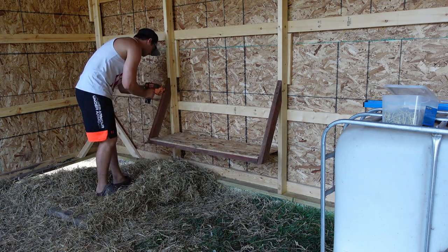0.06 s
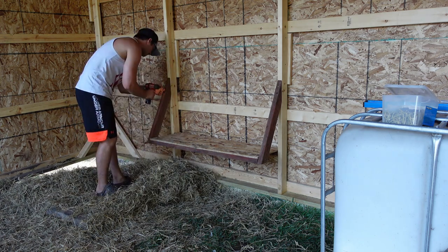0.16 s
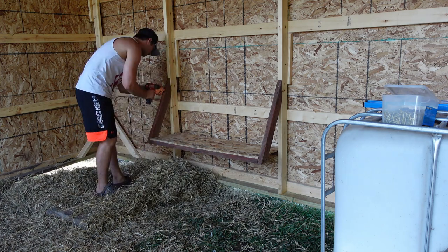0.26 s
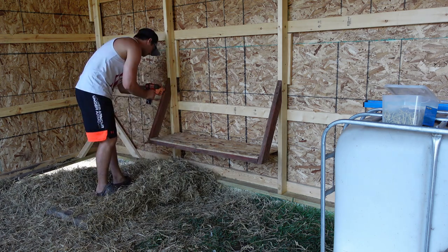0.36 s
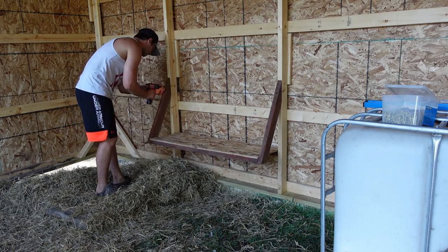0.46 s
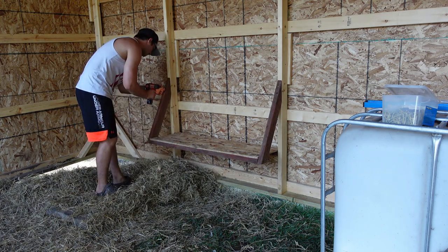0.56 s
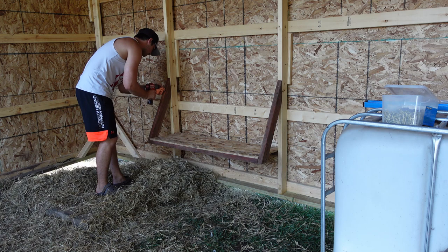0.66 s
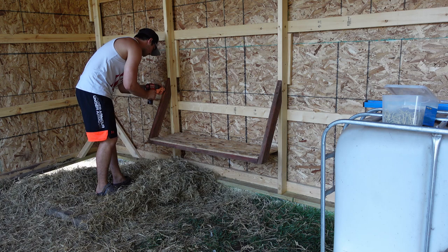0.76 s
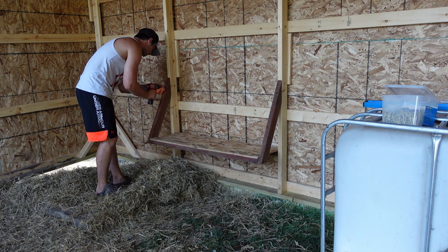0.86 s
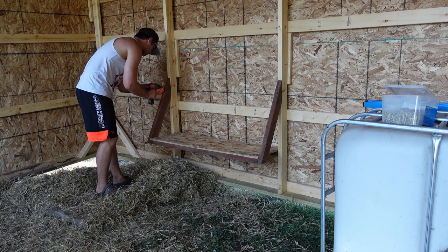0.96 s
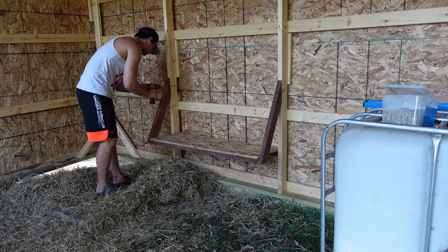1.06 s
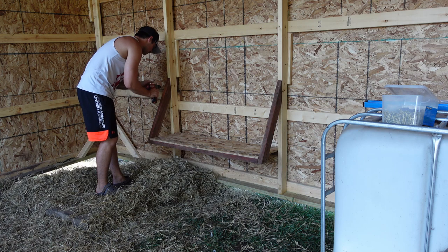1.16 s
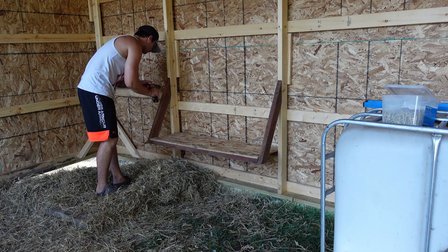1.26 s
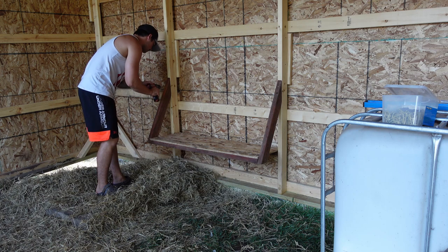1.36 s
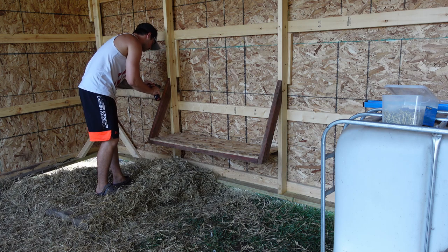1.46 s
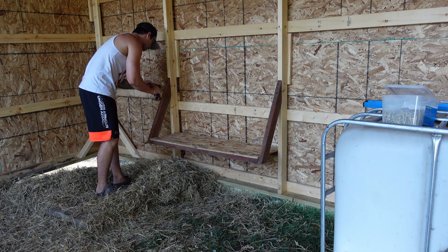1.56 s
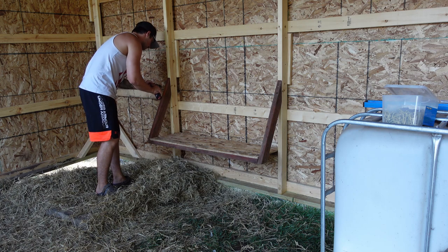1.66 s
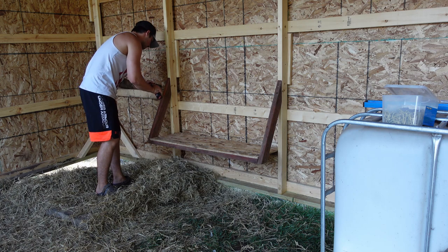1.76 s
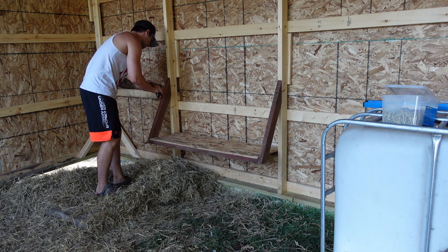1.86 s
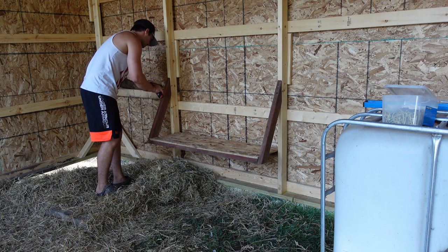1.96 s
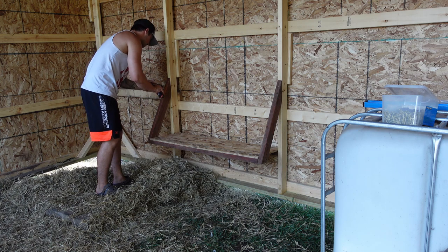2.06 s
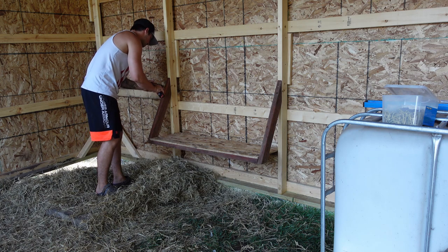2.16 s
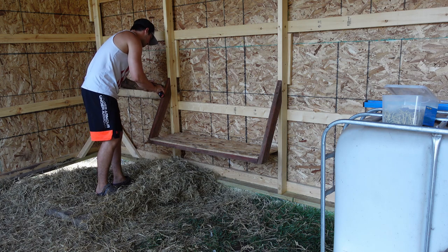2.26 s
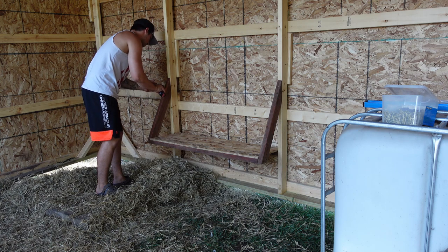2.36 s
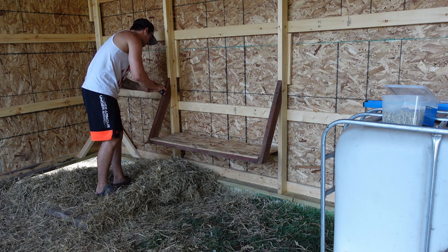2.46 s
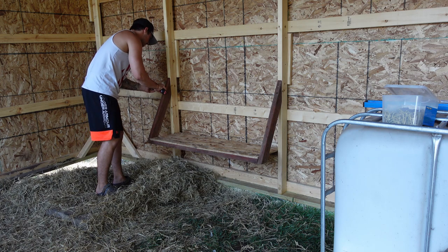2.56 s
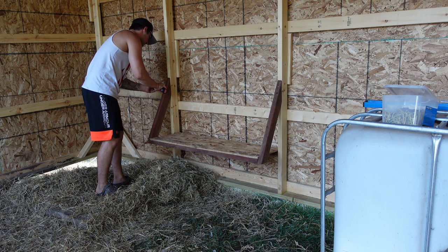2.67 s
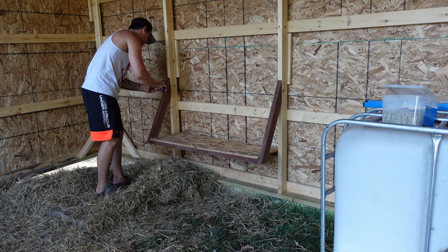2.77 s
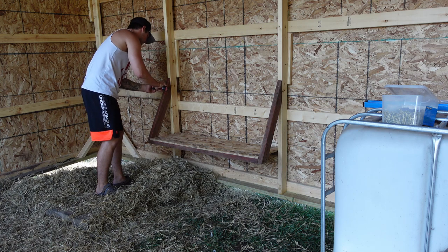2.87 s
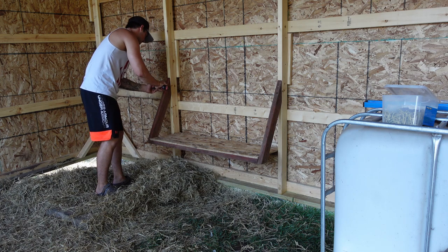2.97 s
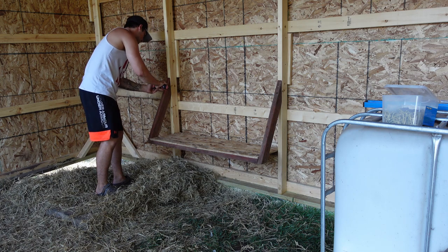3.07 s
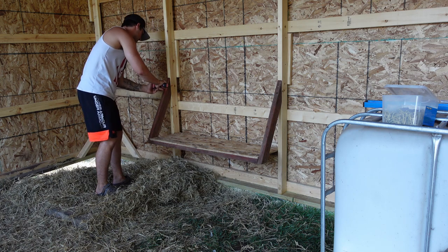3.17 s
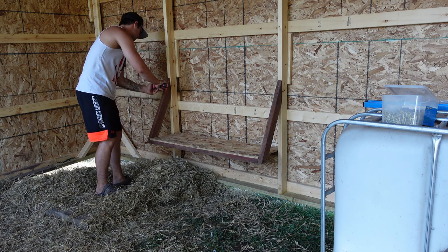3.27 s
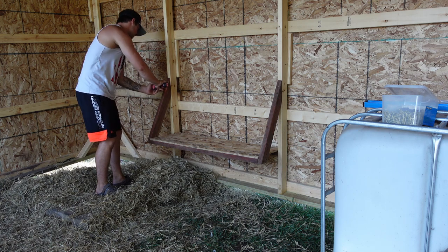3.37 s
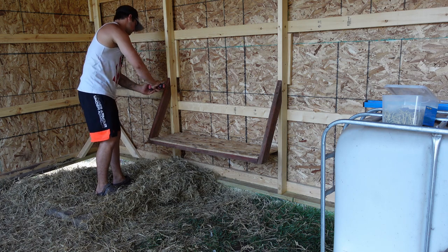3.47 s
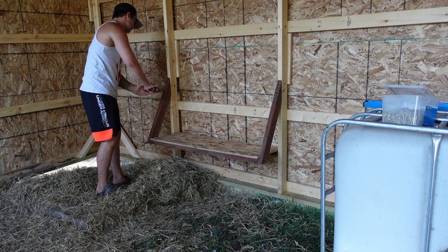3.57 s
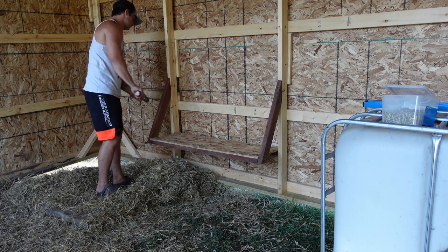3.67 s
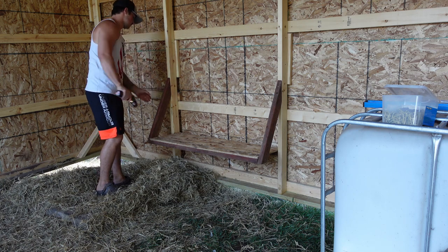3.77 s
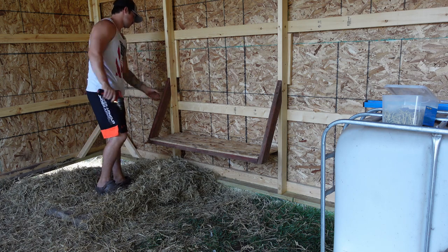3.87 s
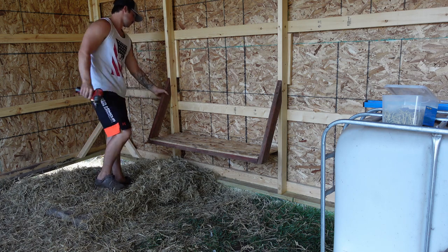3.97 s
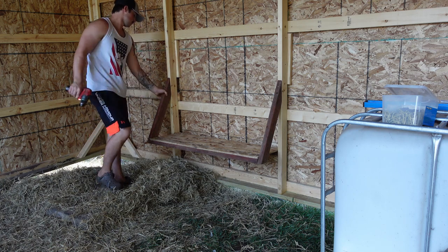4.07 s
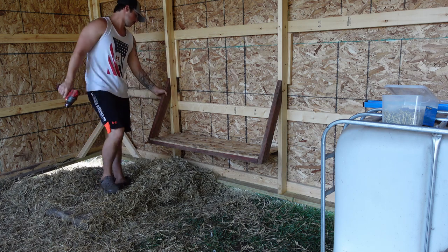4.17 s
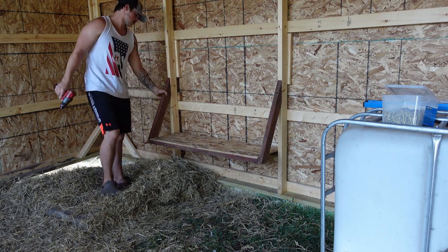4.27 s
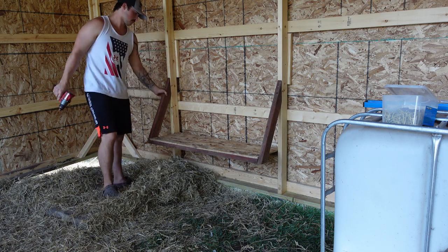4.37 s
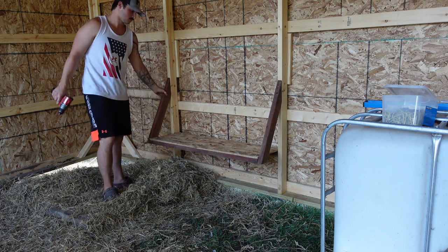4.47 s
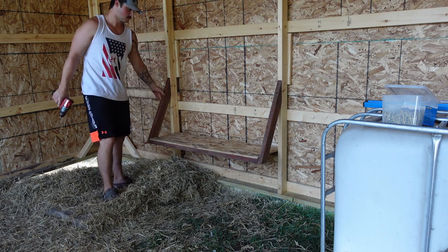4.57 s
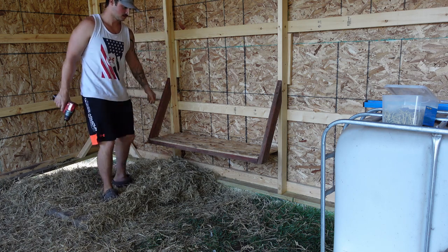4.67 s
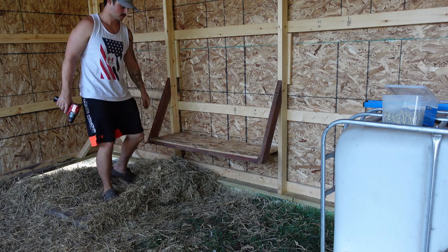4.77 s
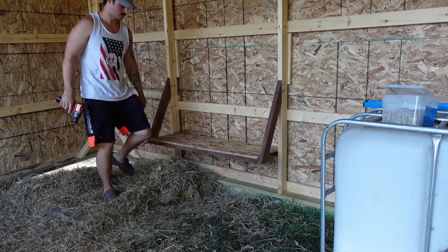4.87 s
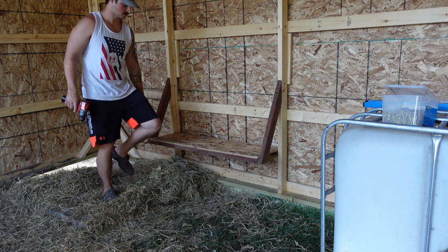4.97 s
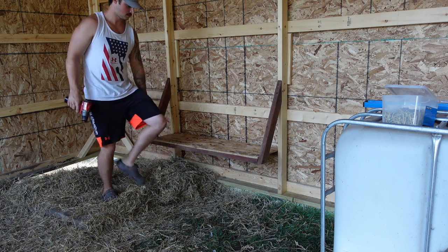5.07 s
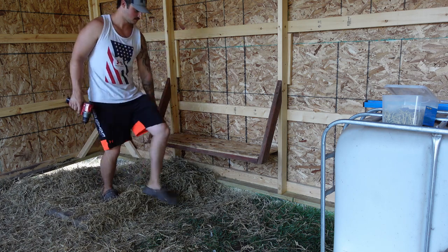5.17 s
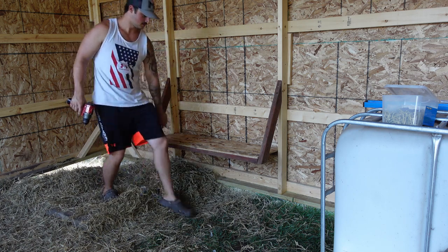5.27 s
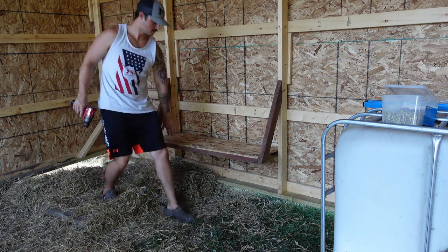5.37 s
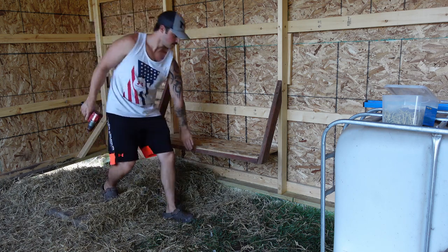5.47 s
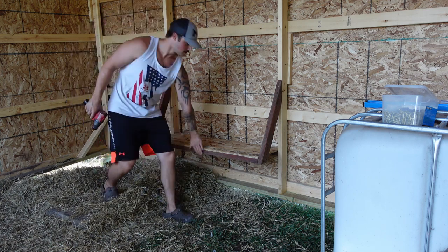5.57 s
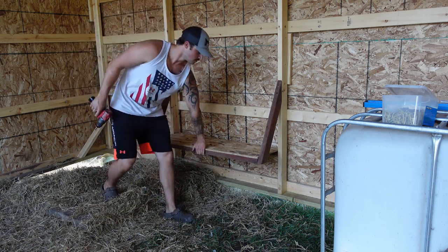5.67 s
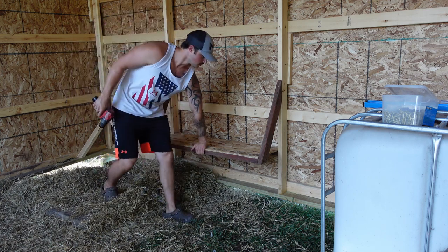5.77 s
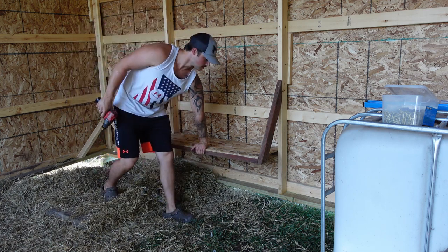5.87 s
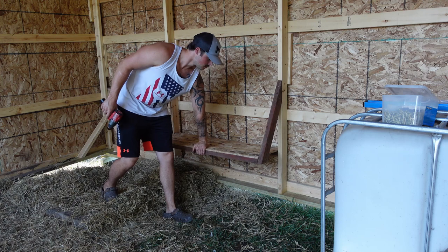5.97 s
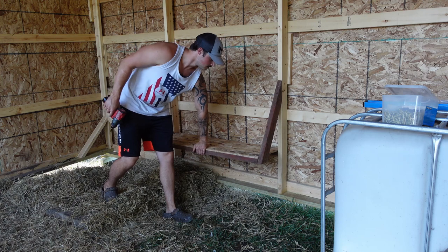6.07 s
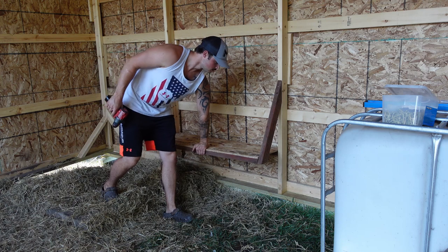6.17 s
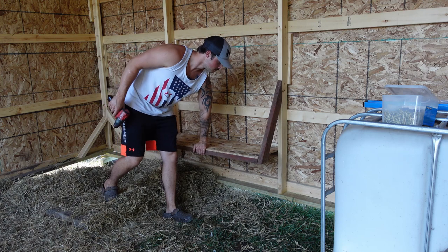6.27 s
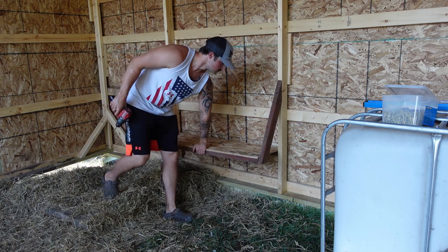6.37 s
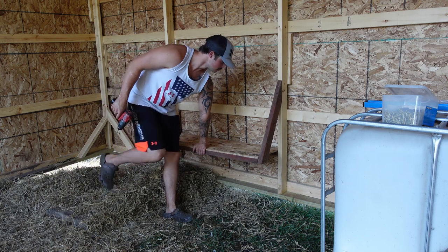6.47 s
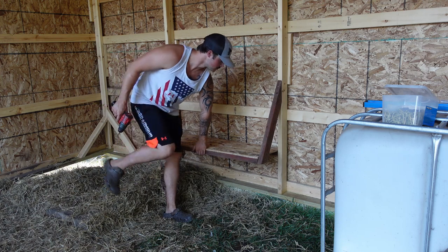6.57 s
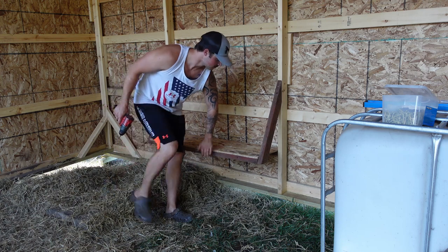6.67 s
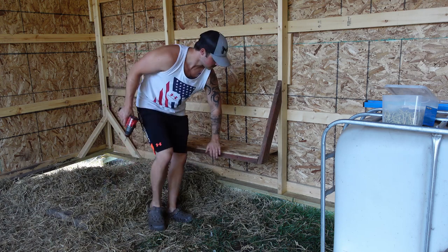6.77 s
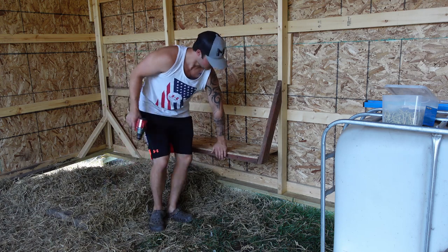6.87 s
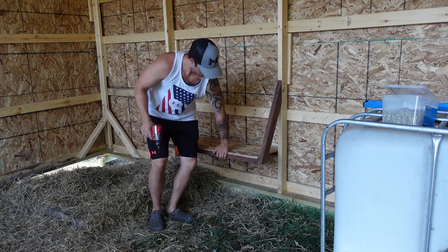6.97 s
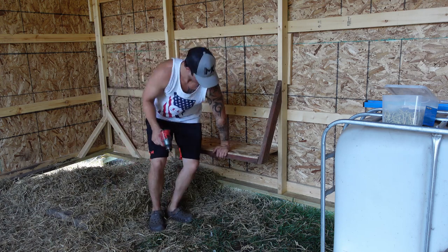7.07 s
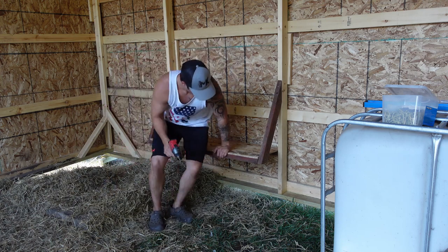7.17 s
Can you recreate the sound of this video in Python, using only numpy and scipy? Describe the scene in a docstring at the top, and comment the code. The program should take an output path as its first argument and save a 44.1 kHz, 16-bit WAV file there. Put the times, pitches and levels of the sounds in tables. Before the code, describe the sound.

In a small wooden shed, two drill bursts drum through timber, the second straining lower, before knocks, rustling straw steps and a short shelf creak.

```python
"""A cordless drill runs twice in a board-lined shed: first creeping up in steps, then at full speed, bogging down
as the screw bites. The motor whine is made of sines at multiples of the rotor speed, the gear hiss is coloured
noise, and the timber drums as noise through resonances. Knocks and footfalls are short resonant rattles. Feet
shuffle in straw (noise and clicks), the shelf creaks once (stick-slip pulses and two gliding sines), wind rumbles
on the microphone (low noise) and a faint bed of air noise lies under it all."""
import sys
import numpy as np
from scipy import signal
from scipy.fft import rfft, irfft, next_fast_len
from scipy.io import wavfile
from scipy.ndimage import uniform_filter1d

SR = 44100
rng = np.random.default_rng(int(sys.argv[2]) if len(sys.argv) > 2 else 0)


def dump(signal):
    """Clip the signal to [-1, 1] and save it as 16-bit WAV at the path in sys.argv[1]."""
    limited = np.clip(np.atleast_2d(signal).T, -1, 1)
    pcm = np.round(limited * 32767).astype(np.int16)
    wavfile.write(sys.argv[1], SR, pcm)


N = 318222
CUTOFF_HZ = 15800   # no motor sine lies above this, and the final low-pass closes just over it


def from_db(db):
    """dB to gain."""
    return 10 ** (np.asarray(db) / 20)


def rms_one(x):
    """Scale to rms 1."""
    return x / np.sqrt(np.mean(x ** 2) + 1e-20)


def in_time(rows, start=0, stop=N):
    """Columns of a table of curves over time, one value a sample; the ends are held."""
    seconds, *columns = np.transpose(rows)
    sample_s = np.arange(start, stop) / SR
    return [np.interp(sample_s, seconds, column) for column in columns]


def at_hz(points, hz):
    """Read a curve of dB against frequency, on a log-frequency axis."""
    points = np.array(points)
    return np.interp(np.log(hz), np.log(points[:, 0]), points[:, 1])


def drift(rate_hz, size=N):
    """Slow random wander of spread 1: noise smoothed at one value per 40 samples, then joined by lines."""
    r = np.exp(-80 * np.pi * rate_hz / SR)
    noise = rng.standard_normal(size // 40 + 2002)
    slow = signal.lfilter([1], [1, -2 * r, r * r], noise)[2000:]   # drop the filter's start
    return np.interp(np.arange(size) / 40, np.arange(len(slow)), rms_one(slow))


def coloured(x, spectrum):
    """Give a signal the spectrum, closed below its low end; rms 1."""
    hz = np.arange(len(x) // 2 + 1) * SR / len(x) + 1
    gain = from_db(at_hz(spectrum, hz)) * (hz > spectrum[0][0])
    return rms_one(irfft(rfft(x) * gain, len(x)))


def resonate(x, hz, width_hz):
    """One resonance, gain 1 on top."""
    r = np.exp(-np.pi * width_hz / SR)
    feedback = [1, -2 * r * np.cos(2 * np.pi * hz / SR), r * r]
    return signal.lfilter([(1 - r * r) / 2, 0, (r * r - 1) / 2], feedback, x)


def body(x, modes, flicker_db):
    """Parallel resonances whose tops stand at the given dB, each driven unevenly; rms 1."""
    total = 0
    for k, (hz, width_hz, db) in enumerate(modes):
        drive = x * from_db(flicker_db * drift(6.4, len(x)))
        total = total + (-1) ** k * from_db(db) * resonate(drive, hz, width_hz)
    return rms_one(total)


def grains(per_s, spread_db, size=N):
    """Random clicks of uneven strength."""
    strength = from_db(spread_db * np.minimum(rng.exponential(1, size), 4))
    sizes = strength * rng.choice([-1, 1], size)
    return sizes * (rng.random(size) < per_s / SR) + 1e-18


def burst(hz, width_hz, t60_s, attack_s):
    """A dying rattle of soft contacts in a steep resonance; peak 1."""
    age = np.arange(SR // 3) / SR
    fade = from_db(-60 * age / max(t60_s, .02))
    rattle = rng.standard_normal(len(age)) * fade * np.minimum(age / attack_s, 1)
    thud = resonate(resonate(rattle, hz, width_hz), hz, width_hz)
    return thud / np.abs(thud).max()


def air():
    """Faint steady noise, strongest in the lows."""
    # colour of the noise: (pitch_hz, relative level_db per Hz)
    air_colour = [(53, -22), (90, -14), (136, -3), (671, -8.5), (1740, -13.5), (2980, -17.5), (6490, -21.5),
                  (8230, -18), (13800, -31), (15700, -20)]
    return from_db(-47) * coloured(rng.standard_normal(N), air_colour)


def wind():
    """Lumpy low noise of air across the microphone port."""
    # gusts: (time_s, deep rumble level_db, upper rumble level_db)
    gust_levels = [(0.0, -49.5, -47.5), (0.38, -29, -48), (0.54, -42, -47), (1.45, -43, -49),
                   (1.67, -28.5, -49), (2.4, -36.5, -37.5), (3.03, -31.5, -54), (3.52, -39, -29.5),
                   (3.9, -45, -58.5), (4.1, -42, -37.5), (4.4, -40.5, -57), (5.2, -57.5, -57.5),
                   (5.79, -42, -38), (6.5, -33.5, -52), (6.75, -38, -56), (7.22, -45, -54)]
    # the deep and the upper rumble: [low edge_hz, high edge_hz]
    rumble_bands = [20, 36], [48, 77]
    out = 0
    for level_db, band_hz in zip(in_time(gust_levels), rumble_bands):
        band = signal.butter(2, band_hz, "band", fs=SR, output="sos")
        gusts = signal.sosfilt(band, rng.standard_normal(N))
        out = out + from_db(level_db) * rms_one(gusts)
    return out


def shed(x):
    """Sound circles between the board walls on twelve unrelated paths, duller on every round."""
    T60_S, WALLS_DB, DULL_HZ = 0.31, -12.5, 5300   # decay in the lows, level, where highs start to die sooner
    size = next_fast_len(N + SR)
    hz = np.arange(size // 2 + 1) * SR / size
    t60_s = T60_S / np.sqrt(1 + (hz / DULL_HZ) ** 2)
    walls = 0
    for k, lag_s in enumerate(np.geomspace(.011, .037, 12)):
        round_trip = from_db(-60 * lag_s / t60_s) * np.exp(-2j * np.pi * hz * lag_s)
        walls = walls + (-1) ** k * round_trip / (1 - round_trip)   # all rounds of this path
    reverb = from_db(WALLS_DB) * rms_one(np.abs(walls)) * np.exp(1j * np.angle(walls))
    return irfft(rfft(x, size) * (1 + reverb), size)[:N]


def straw():
    """Dense stalk crackle under the feet, and a duller scuff of the soles; each shuffle swells and fades."""
    # feet move: (peak_s, swell_s, fade_s, rustle_db, sole scuff_db)
    shuffles = [(3.95, 0.022, .08, -58, -50), (4.055, 0.064, 0.037, -43.5, -54),
                (4.48, 0.25, 0.26, -39, -50.5), (4.63, 0.17, 0.098, -50, -49),
                (4.82, 0.18, 0.2, -42.5, -42.5), (5.23, 0.048, 0.14, -68, -45), (5.4, 0.24, 0.2, -46, -57),
                (5.48, 0.092, 0.16, -51, -44), (5.7, 0.08, 0.26, -55, -54), (6.27, 0.014, 0.094, -70, -45),
                (6.42, 0.063, 0.11, -37, -38.5), (6.96, 0.087, 0.26, -51, -39)]
    # straw never quite rests: (time_s, level_db)
    settling = [(3.5, -77), (4.4, -64), (5.8, -49.5), (7.2, -48)]
    # colour of the crackle: (pitch_hz, relative level_db per Hz)
    straw_colour = [(880, -60), (1560, -16), (2400, -6), (3970, -9.5), (9910, -8), (13300, -16.5),
                    (15700, -6.5)]
    EDGE_DB = 18.5   # fall of a shuffle at the ends of its swell and fade
    t = np.arange(N) / SR
    rustle, scuffing = from_db(in_time(settling)[0]), 0
    for peak_s, swell_s, fade_s, rustle_db, scuff_db in shuffles:
        before = (peak_s - t) / max(swell_s, .005)
        after = (t - peak_s) / max(fade_s, .005)
        shape = from_db(-EDGE_DB * np.where(t < peak_s, before, after))
        rustle = rustle + from_db(rustle_db) * shape
        scuffing = scuffing + from_db(scuff_db) * shape
    stalks = rng.standard_normal(N) + 0.75 * rms_one(grains(1500, 2.2))
    crackle = coloured(stalks, straw_colour)
    soles = rng.standard_normal(N) + rms_one(grains(500, 1.7))
    scuff = rms_one(resonate(soles, hz=1180, width_hz=440))
    return rustle * crackle + scuffing * scuff


def creak():
    """Fast stick-slip at a joint squeaks, and rough rubbing rings the shelf."""
    # the rub: (time_s, level_db before a 5 dB cut, slips per s)
    rubbing = [(6.865, -55, 510), (6.885, -27, 555), (6.945, -27.5, 623), (6.99, -25, 575),
               (7.06, -28, 578), (7.17, -53, 530)]
    # resonances of the shelf: (pitch_hz, width_hz, level_db)
    shelf = [(558, 34, -10), (625, 61, -7.5), (1013, 16, -4.5), (1150, 23, -6), (1578, 57, -2),
             (1890, 17, -8), (2770, 150, -19), (3900, 290, -27)]
    # the joint squeals on two gliding partials: (time_s, lower pitch_hz, lower level_db, upper level_db)
    squeal_glide = [(6.875, 2860, -70, -75), (6.89, 2860, -41, -56), (6.93, 2870, -40, -60),
                    (6.955, 2713, -37.5, -51), (7.05, 2694, -44, -49), (7.13, 2707, -65, -70)]
    UPPER_RATIO = 1.77   # upper pitch over lower pitch
    level_db, per_s = in_time(rubbing)
    slip_count = np.floor(np.cumsum(per_s * (1 + .012 * drift(60))) / SR)
    slips = np.diff(slip_count, prepend=0)   # a pulse at each slip
    rub = slips * from_db(1.2 * rng.standard_normal(N))
    rub += 0.075 * rng.standard_normal(N) * from_db(2.7 * drift(40))
    sample = np.arange(N)
    loaded = (sample > rubbing[0][0] * SR) & (sample < rubbing[-1][0] * SR)
    hz, low_db, high_db = in_time(squeal_glide)
    phase = 2 * np.pi * np.cumsum(hz * (1 + .006 * drift(52))) / SR
    squeal = from_db(low_db + 3.2 * drift(40)) * np.sin(phase)
    squeal += from_db(high_db + 2.7 * drift(40)) * np.sin(UPPER_RATIO * phase)
    return loaded * (from_db(level_db - 5.0) * body(rub, shelf, flicker_db=3.5) + squeal)


def knocks():
    """Each knock rattles around its own centre, makes the boards thump and crunches some straw."""
    # knocks on timber and footfalls: (start_s, peak_db before a 0.5 dB lift, centre_hz, t60_s,
    # low thump_db, straw crunch_db before a 7.5 dB cut)
    hits = [(1.048, -24, 450.6, 0.071, -22, -13.5), (1.143, -24, 470, 0.34, -45, -41),
            (3.34, -14.5, 314.6, 0.097, -21, -53.5), (3.412, -48, 339, 0.13, -25.5, -59),
            (3.493, -29, 600, 0.18, -25, -57), (3.519, -30.5, 480, 0.068, -39, -47),
            (3.929, -26.5, 453, 0.21, -56, -52), (4.03, -32, 315, 0.26, -33, -42),
            (4.578, -24, 380, 0.11, -33.5, -37), (4.8, -29, 1200, 0.048, -43, -42),
            (5.18, -38, 1260, 0.29, -57, -51), (5.43, -35, 400, 0.057, -46, -28),
            (5.47, -28, 915, 0.046, -52, -40), (5.662, -36, 301, 0.17, -29, -29),
            (5.769, -41, 301, 0.19, -40, -30), (6.07, -36.5, 295, 0.11, -37, -26),
            (6.249, -25, 430, 0.33, -55, -54), (6.409, -30.5, 1300, 0.098, -54, -44),
            (6.863, -35, 1610, 0.22, -51, -41)]
    RISE_CYCLES = 2.9   # a knock builds up over this many cycles of its centre pitch
    out = np.zeros(N)
    for start_s, peak_db, hz, t60_s, thump_db, crunch_db in hits:
        knock = from_db(peak_db + 0.5) * burst(hz, 350 + 0.27 * hz, t60_s, RISE_CYCLES / hz)
        knock += from_db(thump_db) * burst(151, 101, t60_s=0.35, attack_s=0.0074)
        knock += from_db(crunch_db - 7.5) * burst(1800, 5100, t60_s=0.096, attack_s=0.0071)
        out[int(start_s * SR):][:len(knock)] += knock
    return out


def timber(size, tight):
    """The thread tears fibres unevenly; this noise shakes frame and wall, which ring more as they draw tight."""
    # frame and wall resonances: (pitch_hz, width_hz, level_db)
    loose_frame = [(130.5, 40, 0.5), (139.4, 16.7, 6.5), (219, 46, 5.5), (415, 56, -1), (503, 30, 5),
                   (740, 89, -2), (1140, 110, -3)]
    # these ring out as the screw draws the frame tight to the wall: (pitch_hz, width_hz, level_db)
    tight_frame = [(143, 13.4, -5.5), (590.4, 10.6, 2), (629.2, 11.4, 0), (732, 15, -2.5), (1143, 8.6, -8)]
    bite = rng.standard_normal(size) * from_db(1.0 * drift(32, size))
    low_cut = signal.butter(6, 108, "high", fs=SR, output="sos")
    drumming = signal.sosfilt(low_cut, body(bite, loose_frame, flicker_db=0.94))
    return drumming + tight * body(bite, tight_frame, flicker_db=4.0)


def gear_hiss(turn, hiss_db, unrest, hiss_colour, start, stop):
    """Noise and clicks of the teeth, throbbing once a turn, heard directly and through the ringing shell."""
    # buzzing shell: (pitch_hz, width_hz, level_db)
    casing_rattle = [(3180, 390, -1), (5370, 93, 4)]
    # under heavy load the shell rings at one place: (time_s, level_db over the hiss curve)
    strain = [(2.9, -30), (2.99, -16), (3.045, -8), (3.12, -23), (3.25, -18), (3.285, -15)]
    HISS_DB, RATTLE_DB = -5.5, -22.5   # both against the hiss curve
    KICK_DB, KICK_S = 18, 0.11   # gears take up slack as the trigger is pulled: extra buzz, decay time
    size = stop - start
    teeth = rng.standard_normal(size) * (1 + 0.084 * np.cos(turn))
    teeth += 0.33 * rms_one(grains(2500, 3.2, size))
    hiss = from_db(hiss_db + HISS_DB + 1.0 * drift(15, size)) * coloured(teeth, hiss_colour)
    kick_db = KICK_DB * np.exp(-np.arange(size) / SR / KICK_S)
    buzz = body(teeth, casing_rattle, flicker_db=0.0)
    hiss += from_db(hiss_db + RATTLE_DB + kick_db) * unrest ** 1.14 * buzz
    ringing = body(teeth, [(3210, 70, 0)], flicker_db=7.0)   # one mode: pitch_hz, width_hz, level_db
    return hiss + from_db(hiss_db + in_time(strain, start, stop)[0]) * ringing


def single_orders(turn, rotor_hz, hiss_db, labour, lone, start, stop):
    """Single strong multiples of the rotor speed, and the spindle gear that sings as the screw loads it."""
    # spindle gear: (time_s, level_db over the hiss curve)
    spindle_load = [(1.74, -33), (1.84, -22), (2.3, -11.5), (2.4, -4), (2.6, -3.5), (3.0, -12),
                    (3.2, -16.5)]
    SPINDLE_ORDER = 1.733   # its pitch as a multiple of the rotor speed
    lone_db = {k: at_hz(curve, rotor_hz) for k, curve in lone.items()}
    lone_db[SPINDLE_ORDER], = in_time(spindle_load, start, stop)
    whine = np.zeros(len(turn))
    for k, db in lone_db.items():
        flicker_db = 1.58 * labour * np.minimum(drift(36, len(turn)), 1.2)
        whine += from_db(hiss_db + db + flicker_db) * np.sin(k * turn)
    return whine


def order_families(turn, rotor_hz, hiss_db, change, unrest, orders_db, poles, sides):
    """Two families of sines on the rotor speed, coloured by the casing; they sink while the speed changes."""
    # casing gain on the motor sines: (pitch_hz, gain_db)
    casing_tone = [(300, -1), (1500, -9.5), (2200, -7), (2750, -1), (3150, 8), (3500, 5), (4200, -7.5),
                   (5000, -3.5), (6300, -20.5), (8300, -4.5), (10000, -13.5), (11500, -28), (13000, -34)]
    SLOWING_DB, SPEEDING_DB, FLICKER_DB = 8.5, 6.5, 3.5   # most they sink either way; base flicker
    smear_db = SLOWING_DB * np.clip(-change / 3, 0, 1) + SPEEDING_DB * np.clip(change / 5, 0, 1)
    poles_db = hiss_db + at_hz(poles, rotor_hz) - smear_db
    sides_db = hiss_db + at_hz(sides, rotor_hz) - smear_db
    whine = np.zeros(len(turn))
    for k, order_db in orders_db.items():
        family_db = sides_db if k % 4 else poles_db   # four pole pairs stress every fourth order
        casing_db = at_hz(casing_tone, k * rotor_hz)
        flicker_db = FLICKER_DB * unrest * np.minimum(drift(24.0, len(turn)), 1)
        gain = from_db(family_db + order_db + casing_db + flicker_db)
        audible = k * rotor_hz < CUTOFF_HZ
        whine += gain * audible * np.sin(k * turn + rng.uniform(0, 2 * np.pi))
    return whine


def drill(pull, orders_db, poles, sides, lone, hiss_colour):
    """One pull of the trigger: the rotor speed drives whine and gear hiss, and the timber shakes along."""
    # the screw draws the frame tight: (time_s, tightness_db)
    tightening = [(2.4, -37), (2.6, -4.5), (3.0, -1.5), (3.2, 1)]
    LABOUR, TIMBER_DB = 2.15, -10   # added roughness as the screw draws tight; timber trim
    start, stop = int(pull[0][0] * SR), int(pull[-1][0] * SR)
    size = stop - start
    rotor_hz, hiss_db, timber_db = in_time(pull, start, stop)
    # relative speed change per s
    change = uniform_filter1d(np.gradient(np.log(rotor_hz)) * SR, size=2000)
    unrest = 1 + .35 * np.minimum(np.abs(change), 3)   # gears run rough while the speed changes
    tight = from_db(in_time(tightening, start, stop)[0])
    labour = unrest + LABOUR * tight
    unsteady_hz = rotor_hz * (1 + 0.00068 * labour * drift(39.0, size))
    turn = 2 * np.pi * np.cumsum(unsteady_hz) / SR   # rotor angle
    whine = single_orders(turn, rotor_hz, hiss_db, labour, lone, start, stop)
    whine += order_families(turn, rotor_hz, hiss_db, change, unrest, orders_db, poles, sides)
    hiss = gear_hiss(turn, hiss_db, unrest, hiss_colour, start, stop)
    drumming = from_db(timber_db + TIMBER_DB) * timber(size, tight)
    out = np.zeros(N)
    soft_ends = signal.windows.tukey(size, .01)
    out[start:stop] = (np.sqrt(2) * whine + hiss + drumming) * soft_ends
    return out


def half_trigger_pull():
    """The first pull creeps up in steps; the chopped current of a half-pulled trigger reaches high orders."""
    # the pull: (time_s, rotor speed_hz, hiss curve_db, timber_db before the timber trim)
    half_pull = [(0.066, 73.4, -36, -47), (0.08, 78, -35, -41), (0.128, 85.95, -26, -31),
                 (0.246, 96.9, -26, -33.5), (0.444, 98.03, -26.5, -26), (0.47, 109.6, -23, -26),
                 (0.51, 119.5, -24, -26), (0.69, 122.7, -22.5, -23.5), (0.742, 166.9, -20, -22.5),
                 (0.812, 171.7, -19.5, -24), (0.99, 175.6, -20, -21), (1.034, 163.7, -22, -16.5),
                 (1.12, 134.6, -67, -39)]
    # sines that stand out: {multiple of the rotor speed: level_db in its family}
    half_orders = {4: 1.5, 8: 5, 12: 5, 15: 9.5, 16: 11, 18: -5, 19: -2, 20: 4.5, 24: -1.5, 32: 3, 40: -4,
                   44: 3, 48: -4, 52: 4.5, 56: -3, 64: 11.5, 68: 7, 72: 5, 80: 3, 88: 6, 92: 10}
    # family of every fourth order: (rotor speed_hz, level_db over the hiss curve)
    half_poles = [(87, -45), (96, -19), (176, -19)]
    # family of the other orders: (rotor speed_hz, level_db over the hiss curve)
    half_sides = [(130, -22.5), (165, -16), (176, -23)]
    # single orders, 1 is imbalance: {multiple: (rotor speed_hz, level_db over the hiss curve)}
    half_lone = {1: [(122, -24), (165, -4), (172, -8.5), (176, -37)], 2: [(96.5, -28.5), (98.5, -7),
                 (120, -15.5), (122.5, -4.5), (132, -16), (176, -23.5)], 28: [(90, -46), (96, -9.5),
                 (100, -17), (108, -4.5), (122, -11), (140, -27), (176, -18)]}
    # colour of gear hiss and switching noise: (pitch_hz, relative level_db per Hz)
    half_hiss = [(410, -63), (700, -7.5), (1400, -5.5), (2170, -6.5), (3380, -8.5), (4110, -13.5),
                 (4930, -4.5), (6900, -15), (8400, -6), (10200, -16), (13300, -27), (15700, -16.5)]
    return drill(half_pull, half_orders, half_poles, half_sides, half_lone, half_hiss)


def full_trigger_pull():
    """The second pull races to full speed, then slows as the screw bites."""
    # the pull: (time_s, rotor speed_hz, hiss curve_db, timber_db before the timber trim)
    full_pull = [(1.492, 125.8, -32.5, -54), (1.518, 143.6, -21.5, -13), (1.55, 169.1, -19.5, -16.5),
                 (1.596, 264, -14.5, -15), (1.62, 279.2, -14, -18.5), (1.666, 354, -12.5, -14.5),
                 (1.7, 367, -14.5, -15), (1.78, 377.5, -14, -18), (1.972, 384.5, -13, -13.5),
                 (2.114, 387.9, -16.5, -21), (2.33, 386.8, -17, -17.5), (2.39, 384.8, -13.5, -14.5),
                 (2.448, 358.7, -15, -18), (2.52, 293.3, -14, -13), (2.585, 269.7, -15, -17),
                 (2.65, 261.4, -16.5, -16.5), (2.934, 227.3, -17, -16.5), (3.004, 215.2, -17, -14),
                 (3.07, 214, -17.5, -14.5), (3.1, 219.9, -17.5, -15), (3.28, 222.2, -16.5, -15),
                 (3.315, 184.7, -25.5, -13), (3.39, 119.8, -64, -42)]
    # sines that stand out: {multiple of the rotor speed: level_db in its family}
    full_orders = {2: -7, 3: -1.5, 4: 7.5, 6: 0.5, 9: -7, 10: -4, 12: -5.5, 15: 2.5, 20: -3, 26: -1, 28: -4,
                   52: 2}
    # family of every fourth order, weak near free-running speed where the current ebbs:
    # (rotor speed_hz, level_db over the hiss curve)
    full_poles = [(150, -26), (195, -28), (215, -16), (350, -9), (374, -8), (383, -30), (388, -34)]
    # family of the other orders: (rotor speed_hz, level_db over the hiss curve)
    full_sides = [(215, -19), (270, -22), (388, -10.5)]
    # single orders, 1 is imbalance, 13 the pinion: {multiple: (rotor speed_hz, level_db over the hiss curve)}
    full_lone = {1: [(222, -23), (230, -12), (340, -6.5), (360, -11.5), (383, -6.5), (387.5, -15.5)],
                 8: [(216, -17), (270, -12.5), (360, -9), (373, -1), (384, -12), (387, 2.5)],
                 13: [(225, -20), (310, -38), (372, -8), (388, -8.5)], 7: [(215, -16.5), (270, -20),
                 (350, -26), (388, -11.5)], 37: [(215, -21), (240, -20), (270, -50)], 16: [(150, -22),
                 (175, -2.5), (200, -7), (216, -11), (235, -16.5), (262, -20), (300, -32)]}
    # colour of the gear hiss: (pitch_hz, relative level_db per Hz)
    full_hiss = [(420, -35), (750, -11), (1150, -6), (1450, -0.5), (2570, -4), (3250, -3), (4200, -6.5),
                 (5000, -2), (6300, -9.5), (8300, -8), (10200, -13), (11500, -20), (15700, -25)]
    return drill(full_pull, full_orders, full_poles, full_sides, full_lone, full_hiss)


def scene():
    """Drill, knocks and creak echo in the shed; straw, wind and air are added dry; both channels are alike."""
    tool = half_trigger_pull() + full_trigger_pull()
    mono = shed(tool + knocks() + creak()) + straw() + wind() + air()
    return np.array([mono, mono])


def record(dry):
    """Peaks are rounded, the top is cut."""
    rounded = 1.5 * np.tanh(dry / 1.5)
    top_cut = signal.cheby2(14, 70, CUTOFF_HZ + 170, fs=SR, output="sos")
    return signal.sosfilt(top_cut, rounded)


dry = scene()
out = record(dry)
dump(out)
```